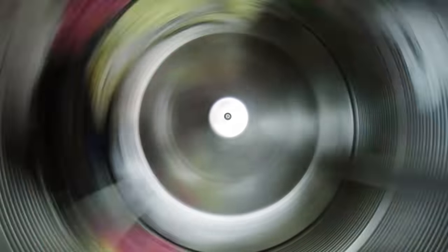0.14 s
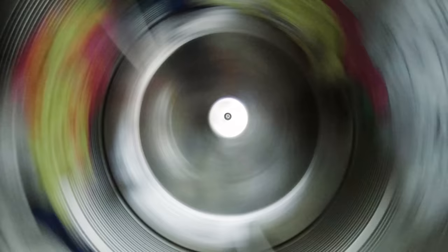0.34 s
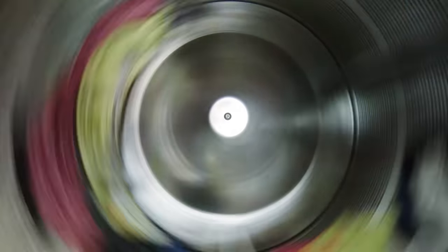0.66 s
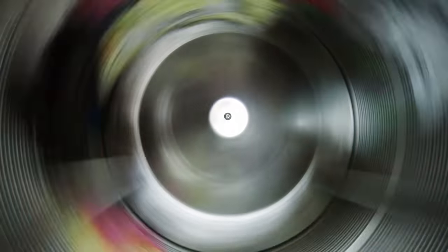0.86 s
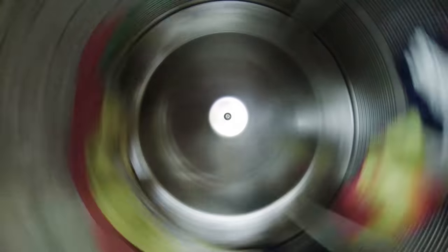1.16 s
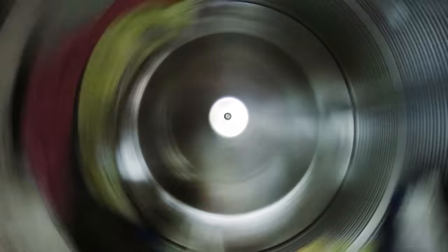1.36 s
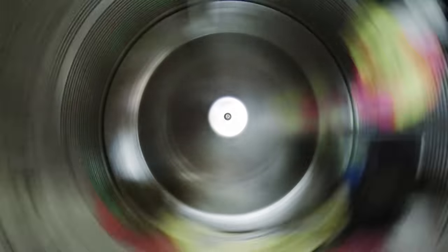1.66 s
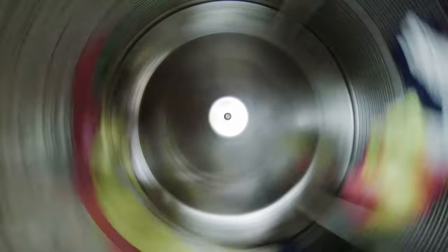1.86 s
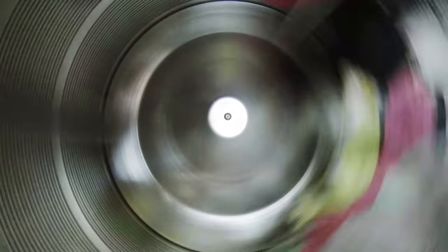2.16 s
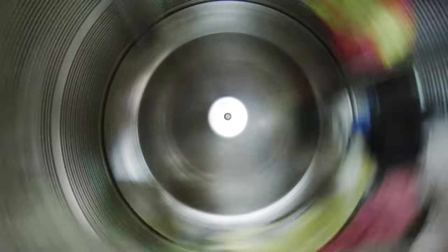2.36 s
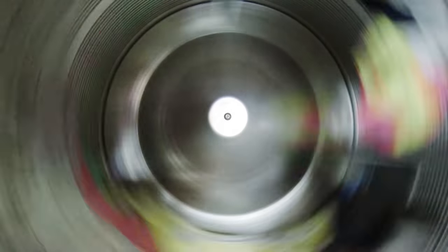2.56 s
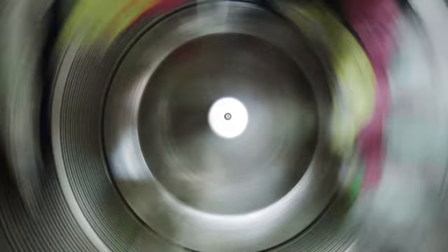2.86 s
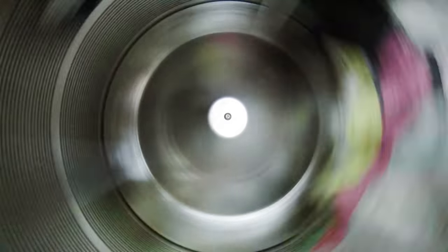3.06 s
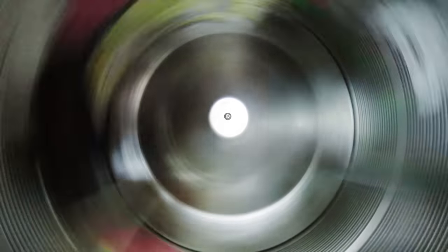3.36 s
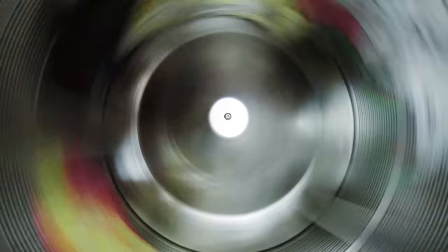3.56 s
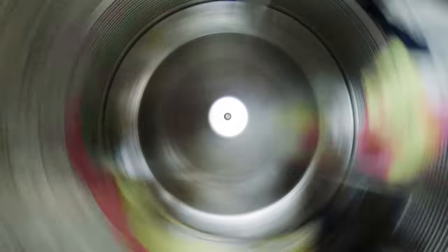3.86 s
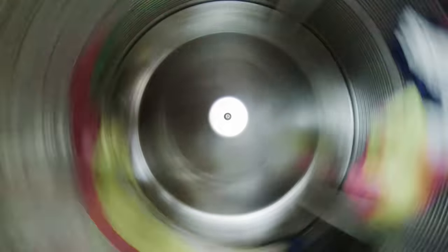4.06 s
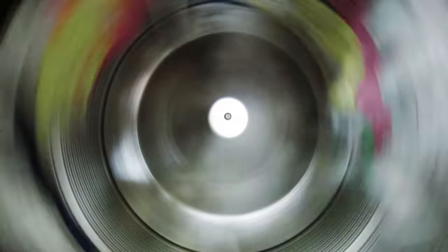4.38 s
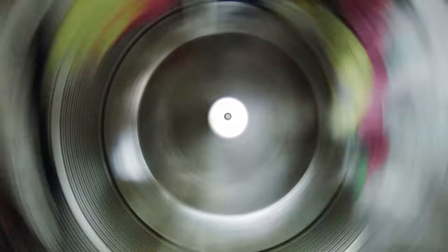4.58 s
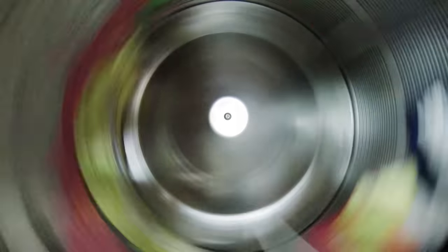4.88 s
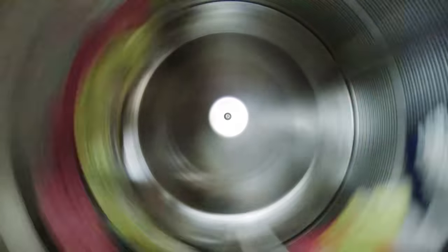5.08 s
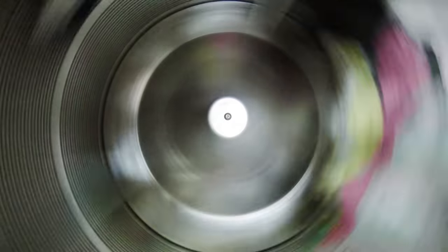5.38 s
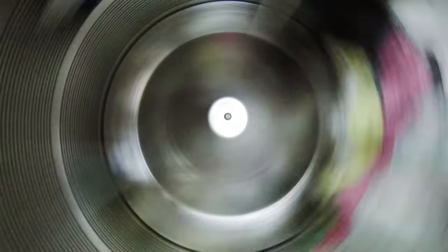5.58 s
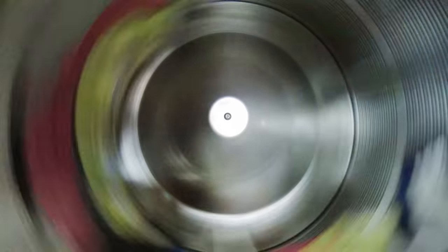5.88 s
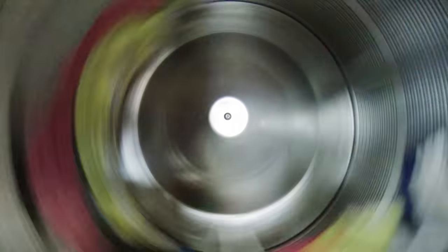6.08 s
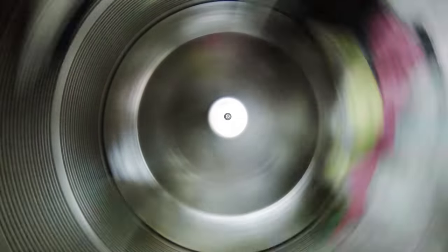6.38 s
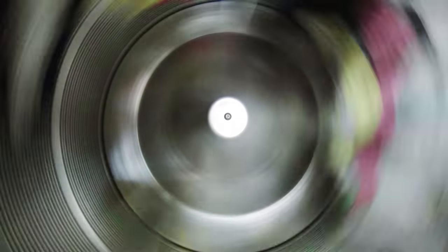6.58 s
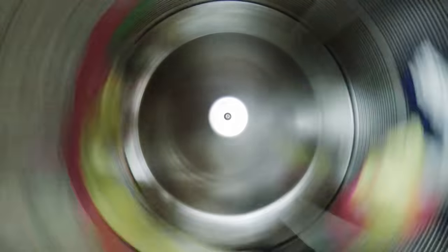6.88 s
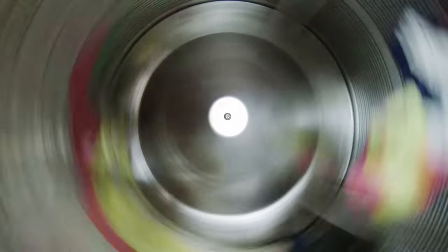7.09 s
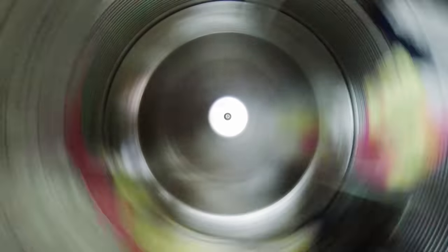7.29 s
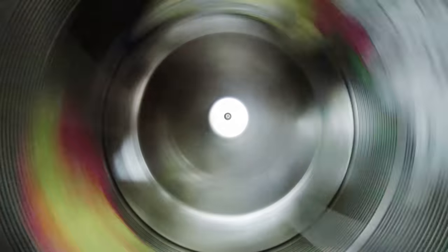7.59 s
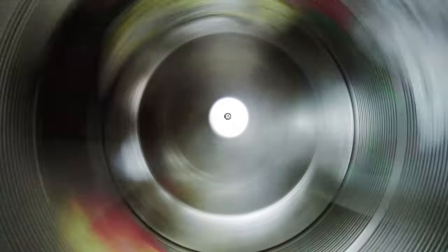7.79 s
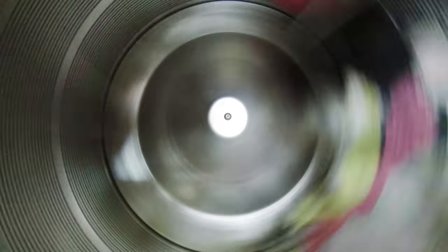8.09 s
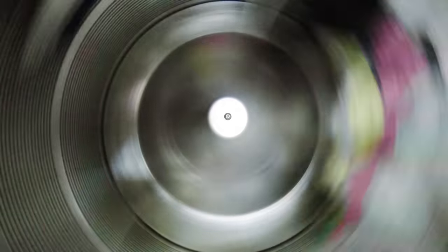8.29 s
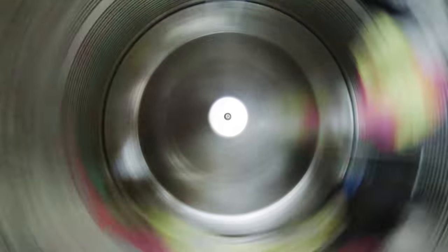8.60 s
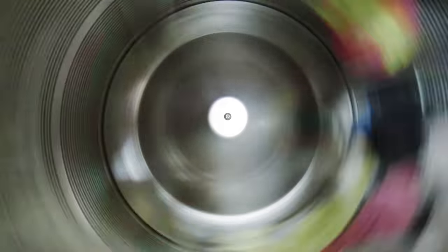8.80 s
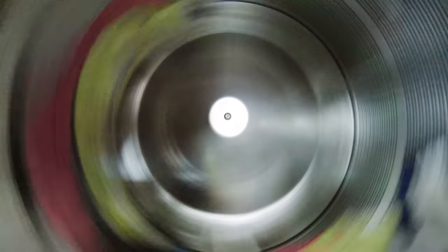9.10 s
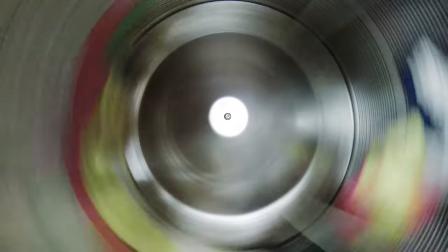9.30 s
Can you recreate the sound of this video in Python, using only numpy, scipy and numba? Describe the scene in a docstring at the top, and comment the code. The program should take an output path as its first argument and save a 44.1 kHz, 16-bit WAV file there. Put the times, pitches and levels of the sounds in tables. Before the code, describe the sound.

From inside a steel washer drum comes a continuous low rumble, with an electric hum and a metallic motor whirr, gradually picking up speed. Wads of clothes swish faintly around and thud against the wall, one heavy drop booming near the start. The soft thumps grow more frequent toward the end, and small fasteners now and then tick lightly on the metal.

```python
"""A low rumble and a steely whirr, heard from inside the drum of a front-loading washer gathering speed.
Motor and bearings shake the tub, the air in it, the drum shell and its back wall, over a mains hum.
Three paddles a turn drag the laundry round: each brings a swish, often a soft thump, now and then a tick.
Early on, a heavy heap drops and sets the tub booming. A gain control ducks the mix after hard thumps."""
import sys
import numpy as np
from scipy import signal
from scipy.fft import rfft, irfft
from scipy.io import wavfile
from scipy.ndimage import uniform_filter1d
from numba import njit

SR = 44100
rng = np.random.default_rng(int(sys.argv[2]) if len(sys.argv) > 2 else 0)


def store_wav(level_fs):
    """Save 16-bit WAV to argv[1]."""
    pcm = np.round(np.clip(np.atleast_2d(level_fs), -1, 1) * 32767)
    wavfile.write(sys.argv[1], SR, pcm.T.astype(np.int16))


N = 416744
TIME = np.arange(N) / SR

# The drum picking up speed: time_s, turns_per_s
DRUM_SPEED = [(0.0, 1.3427), (4.0, 1.5708), (9.45, 1.8582)]
# Tones of the belt-driven motor and bearings: cycles_per_turn, relative_db
DRIVE_ORDERS = [(20.97, 11), (23.21, 6), (24.03, 5), (34.77, 15), (40.68, 5), (77.73, 12), (80.31, 12),
                (85.5, 14), (126.27, 17), (139.14, 8), (152.03, 10), (236.5, 11), (378.88, 10),
                (408.06, 12), (451.69, 17.5), (912.91, 12), (978.25, 12), (1000.5, 12), (1033.16, 12),
                (1065.19, 12)]

# Level rides for the tub's sway, the air's boom and the back wall's hum: time_s, relative_db
TUB_RIDE = [(0.0, -22), (0.61, -32), (0.95, -25.5), (1.21, -30), (1.99, -30), (2.69, -23.5), (4.51, -30.5),
            (5.29, -27.5), (5.55, -34), (6.67, -23), (6.85, -28.5), (8.15, -20.5), (8.93, -30.5),
            (9.45, -21)]
AIR_RIDE = [(0.0, -29.6), (1.82, -33.5), (2.51, -24.4), (2.77, -41), (2.86, -26), (3.21, -24.1),
            (3.38, -31), (3.55, -26), (3.81, -29.5), (4.16, -29.1), (6.76, -28.9), (6.93, -21), (7.19, -31),
            (7.37, -21), (7.71, -32.5), (7.8, -24.5), (8.75, -19.5), (9.45, -23.6)]
WALL_RIDE = [(0.04, -18.5), (0.17, -31), (0.55, -24), (0.9, -34.5), (1.65, -21.5), (2.25, -31.5),
             (2.42, -17), (2.55, -31.5), (2.78, -22), (3.0, -34.5), (3.6, -26), (4.15, -32), (4.85, -22),
             (5.1, -34), (5.6, -23.5), (6.3, -32), (9.45, -29)]
# Resonances of the tub, its air, the drum shell and the back wall: pitch_hz, width_hz, relative_db
TUB_MODES = [(37.6, 7.8, 2), (31.5, 5.6, -4.5), (42, 5.9, -11.5)]
AIR_MODES = [(63.2, 8.7, 4.5), (54, 6.8, -17), (80, 13, -10)]
SHELL_MODES = [(127.5, 41, 2.5), (152.9, 26.4, 6), (191.3, 43, -6), (93, 88, -10.5), (270, 20, -16.5),
               (311.4, 39, -13.5), (358.7, 20, -19)]
WALL_MODES = [(204.56, 7.8, 1.5), (215, 19, -10)]

# EQ curves of the drive's whirr and of cloth on perforated steel: frequency_hz, relative_db
WHIRR_EQ = [(200, -82.5), (400, -85), (500, -81), (720, -75.5), (790, -84.5), (1030, -80.5), (1200, -71.5),
            (1600, -68), (2150, -71), (2650, -88.5), (3300, -97), (5000, -125)]
CLOTH_EQ = [(1200, -100), (2600, -90), (3400, -88), (3900, -91.5), (4350, -100), (5500, -99), (6000, -105),
            (8200, -105), (9300, -111), (11200, -109.5), (12000, -115), (13600, -112), (15000, -125)]
# Resonant peaks on those two curves: pitch_hz, width_hz, lift_db
WHIRR_PEAKS = [(455, 27, 4.2), (596, 32, 8.8), (653.6, 55, 6.3), (742, 34, 5.2), (848, 52, 5.2),
               (939, 48, 5.9), (1387, 35, 3.3), (1430, 55, 3.7), (1661.4, 40, 6), (1712, 54, 8.3),
               (1812, 130, 2.2), (2512, 120, 6.7)]
CLOTH_PEAKS = [(2920, 230, 5.1), (5080, 240, 4.6), (7990, 110, 0.86), (10200, 450, 4.6)]
# How each layer swells during one paddle pass: centre_share, width_share, lift_db
SHELL_SWELLS = [(.33, 0.23, 1.1)]
WALL_SWELLS = [(.27, 0.31, 1.2)]
WHIRR_SWELLS = [(.16, .18, 3.5), (.66, 0.075, 1.3)]
CLOTH_SWELLS = [(.02, .16, 3.2), (.28, .12, 2.8)]

# Steady tones of the mains and the motor's whine: pitch_hz, level_db
MAINS_HUM = [(120, -36.5), (240, -37.5), (360, -49)]
MOTOR_WHINE = [(10427, -90), (12645, -96.5), (13124, -91)]

# Laundry landing as a paddle passes: time_s, relative_db
THUMPS = [(0.068, -14), (0.248, -11), (1.037, -10), (2.199, -8.5), (2.871, -11.5), (3.738, -5), (4.165, -7),
          (4.372, -3.5), (4.787, -7), (5.205, -9), (5.807, -4.5), (6.002, -14.5), (6.406, -9), (6.792, -4),
          (7.176, -4), (7.364, -3.5), (7.74, -3.5), (7.926, -6.5), (8.118, -7), (8.304, -3.5), (8.489, -9),
          (8.67, -4), (8.853, -4.5), (9.036, -5.5), (9.215, -2), (9.4, -11.5)]
# The shell's thud under a landing: pitch_ratio, relative_db, t60_s
THUD_MODES = [(1.0, 6, 0.11), (.86, -15.5, 0.095), (1.13, -13, 0.22)]
# The slap of cloth on steel: pitch_hz, relative_db, t60_s
SLAP_MODES = [(317, 2, 0.084), (420, -2.5, 0.042), (620, -24, 0.026)]
# Fasteners touching the steel: start_s, relative_db
FASTENER_TICKS = [(0.7664, -45), (1.6157, -45), (2.0782, -55), (2.9507, -45), (3.4421, -55), (6.9394, -48),
                  (7.2634, -46), (8.0581, -47.5), (8.0744, -43), (8.552, -47), (8.5844, -45), (8.9715, -50)]
# A heavy heap falling from the top of the drum: time_s, relative_db, pitch_hz, slap_offset_db
HEAP_FALL = [(0.745, -6.5, 190.6, -15.5)]
# Tub and air booming under the heap: pitch_hz, relative_db, t60_s
HEAP_MODES = [(61.9, -9, 0.6), (37.3, -29, .8), (78, -35, 0.14)]

PADDLES = 3
PUSH_S = 0.011  # the soft attack of landing cloth


def undb(db):
    """Decibels to gain."""
    return 10 ** (np.asarray(db) / 20)


def curve(points):
    """Join breakpoints into one value per sample."""
    return np.interp(TIME, *np.transpose(points))


def unit(x):
    """Scale to rms 1."""
    return x / np.sqrt(np.mean(x ** 2))


def wander(per_s):
    """Smooth random drift with spread near 1."""
    knots = rng.standard_normal(int(N / SR * per_s) + 2)
    return 1.18 * np.interp(TIME * per_s, np.arange(len(knots)), knots)


def wavering_sine(cycles, db, waver_db, per_s):
    """A sine whose rms level drifts around db."""
    return np.sqrt(2) * undb(db + waver_db * wander(per_s)) * np.sin(2 * np.pi * (cycles + rng.random()))


def swells(turns, bumps):
    """A lift in dB that comes and goes with every paddle pass."""
    return sum(lift * np.exp(-(((PADDLES * turns - centre + .5) % 1 - .5) / width) ** 2 / 2)
               for centre, width, lift in bumps)


def effort(speed, db, doubling_db):
    """A level of db at 1.6 turns a second, growing with each doubling of speed."""
    return db + doubling_db * np.log2(speed / 1.6)


def resonate(x, modes, span_s):
    """Steep resonances adding in power, levelled to a running rms near 1."""
    f = np.arange(N // 2 + 1) * SR / N + .01
    power = sum(undb(db) ** 2 / (1 + ((f * f - hz * hz) / (f * width)) ** 2) ** 2
                for hz, width, db in modes)
    ringing = irfft(rfft(x) * np.sqrt(power), N)
    size = int(span_s * SR)
    return ringing / np.sqrt(uniform_filter1d(uniform_filter1d(ringing ** 2, size), size))


def colour(x, eq, peaks):
    """Shape with an EQ curve and bell peaks, then scale to rms 1."""
    f = np.arange(N // 2 + 1) * SR / N + .01
    hz, db = np.transpose(eq)
    slope_db = np.interp(np.log(f), np.log(hz), db)
    bells_db = sum(lift * .5 ** ((2 * (f - centre) / width) ** 2) for centre, width, lift in peaks)
    return unit(irfft(rfft(x) * undb(slope_db + bells_db), N))


def ring(modes, push_s, length_s):
    """Modes swell while soft cloth presses on the drum, then die away."""
    t = np.arange(int(length_s * SR)) / SR - push_s
    swell = np.exp(-(np.minimum(t, 0) / push_s * 2) ** 2 / 2)
    fade_in = np.minimum(1, 2 * (t / push_s + 1)) ** 2
    tail = sum(undb(db - 60 * np.maximum(t, 0) / t60) * np.cos(2 * np.pi * hz * t) for hz, db, t60 in modes)
    return tail * swell * fade_in


def at_peak(x, db):
    """Scale to a peak level."""
    return x / np.max(np.abs(x)) * undb(db)


def add(track, start_s, sound):
    """Mix a sound into a track."""
    i = max(int(start_s * SR), 0)
    track[i:i + len(sound)] += sound[:max(N - i, 0)]


def drive(turns):
    """Rough-running bearings make noise under wavering tones locked to the drum's angle."""
    tones = sum(wavering_sine(order * turns, db, waver_db=3, per_s=10) for order, db in DRIVE_ORDERS)
    roughness = rng.standard_normal(N) * np.sqrt(SR / 2)  # 0 dB in each Hz
    return roughness + undb(-1.5) * tones


def rumble(force, speed, turns):
    """The rising drive sweeps through tub, air, shell and back wall; the paddles rock shell and wall."""
    shell_db = effort(speed, db=-27, doubling_db=16.5) + swells(turns, SHELL_SWELLS)
    wall_db = curve(WALL_RIDE) - 2 + swells(turns, WALL_SWELLS)
    tub = resonate(force, TUB_MODES, span_s=.31) * undb(curve(TUB_RIDE) + .6)
    air = resonate(force, AIR_MODES, span_s=.12) * undb(curve(AIR_RIDE) - .3)
    shell = resonate(force, SHELL_MODES, span_s=.05) * undb(shell_db)
    wall = resonate(force, WALL_MODES, span_s=.06) * undb(wall_db)
    return tub + air + shell + wall


def steel_whirr(force, speed, turns, snag):
    """The drive sings through the steel, swelling with each paddle."""
    level_db = effort(speed, db=-39, doubling_db=7) + swells(turns, WHIRR_SWELLS) + .14 * snag
    return colour(force, WHIRR_EQ, WHIRR_PEAKS) * undb(level_db)


def cloth_swish(speed, turns, snag, slips_per_s=1500, grain_db=3):
    """Cloth slides over perforated steel in tiny slips: a grainy hiss that each paddle pushes up."""
    level_db = effort(speed, db=-57.4, doubling_db=8.5) + swells(turns, CLOTH_SWELLS) + 1.3 * snag
    slips = (rng.random(N) < slips_per_s / SR) * rng.standard_normal(N)
    slips *= undb(grain_db * np.minimum(rng.exponential(size=N), 4))
    friction = rng.standard_normal(N) + .46 * unit(slips)
    return colour(friction, CLOTH_EQ, CLOTH_PEAKS) * undb(level_db)


def hum_and_whine():
    """The mains hums low and the motor whines high, steady in pitch and wavering in level."""
    hum = sum(wavering_sine(hz * TIME, db, waver_db=1, per_s=6) for hz, db in MAINS_HUM)
    whine = sum(wavering_sine(hz * TIME, db, waver_db=2.5, per_s=6) for hz, db in MOTOR_WHINE)
    return hum + whine


def add_landing(track, time_s, db, pitch_hz, slap_offset_db, slap_lead_s=.00602):
    """Cloth slaps the steel, then its weight thuds on the shell."""
    slap = ring(SLAP_MODES, push_s=.01315, length_s=.25)
    modes = [(ratio * pitch_hz, mode_db, t60) for ratio, mode_db, t60 in THUD_MODES]
    thud = ring(modes, PUSH_S, length_s=.25)
    touch_s = time_s - .004  # cloth touches a little before it lands
    add(track, touch_s - slap_lead_s, at_peak(slap, db + slap_offset_db + .6))
    add(track, touch_s, at_peak(thud, db - 1.3))


def thumps(settled_hz=172.3, sharp_hz=19, settle_s=1.4):
    """Laundry lands, with more slap when harder; the pitch settles as the load spreads out."""
    out = np.zeros(N)
    for time_s, db in THUMPS:
        pitch_hz = settled_hz + sharp_hz * np.exp(-time_s / settle_s)
        add_landing(out, time_s, db, pitch_hz, slap_offset_db=-15 + 1.19 * db)
    return out


def ticks(stray_count=60, t60_s=.018, band_hz=(3300, 9500)):
    """Small hard parts click on the drum, alone or with a landing; many more barely graze it."""
    out, t = np.zeros(N), np.arange(2048) / SR
    bright = signal.butter(2, band_hz, "bandpass", fs=SR, output="sos")
    landings = [(time_s + .005, db - 43.5) for time_s, db, *_ in [*THUMPS, *HEAP_FALL]]
    strays = [(place * N / SR, -62 + 6 * size) for place, size in rng.random((stray_count, 2))]
    for start_s, db in [*FASTENER_TICKS, *landings, *strays]:
        burst = rng.standard_normal(len(t)) * undb(-60 * t / t60_s)
        add(out, start_s, at_peak(signal.sosfilt(bright, burst), db - .5))
    return out


def falling_heap():
    """A heavy heap lands and leaves the tub and its air booming."""
    out = np.zeros(N)
    time_s, db, pitch_hz, slap_offset_db = HEAP_FALL[0]
    add_landing(out, time_s, db, pitch_hz, slap_offset_db)
    add(out, time_s + .0024, undb(4) * ring(HEAP_MODES, PUSH_S, length_s=1.2))
    return out


@njit
def follow(x, attack_s, release_s):
    """A peak envelope that rises fast and falls slowly."""
    out, level = np.empty(len(x)), 0.
    for i in range(len(x)):
        gap = abs(x[i]) - level
        level += gap / (SR * (attack_s if gap > 0 else release_s))
        out[i] = level
    return out


def scene():
    """The turning drum drives a bed of rumble, whirr and swish; the load's hits sit on top."""
    speed = curve(DRUM_SPEED)
    turns = np.cumsum(speed) / SR + .00042 * wander(per_s=7)  # the shifting load tugs at the belt
    force = drive(turns)
    snag = wander(per_s=40)  # folds catch and let go
    bed = rumble(force, speed, turns) + steel_whirr(force, speed, turns, snag)
    bed += cloth_swish(speed, turns, snag)
    hits = thumps() + ticks() + falling_heap()
    return (bed + hits + hum_and_whine())[None]


def record(dry, threshold_db=-11, squeeze=.97, hiss_db=-75, fade_s=.005, top_hz=15100):
    """A gain control ducks loud peaks; faint hiss, short end fades and a steep top cut finish the mix."""
    peak = follow(dry[0], attack_s=.0036, release_s=.09)
    gain = np.maximum(peak / undb(threshold_db), 1) ** -squeeze
    hiss = undb(hiss_db) * rng.standard_normal(N)
    fade = np.minimum(1, np.minimum(TIME, TIME[::-1]) / fade_s)
    top_cut = signal.ellip(10, .2, 80, top_hz, fs=SR, output="sos")
    return signal.sosfilt(top_cut, (dry * gain + hiss) * fade)


dry = scene()
out = record(dry)
store_wav(out)
```